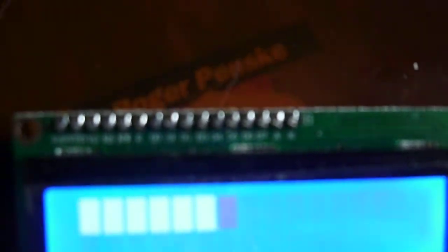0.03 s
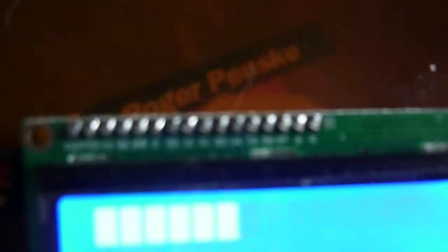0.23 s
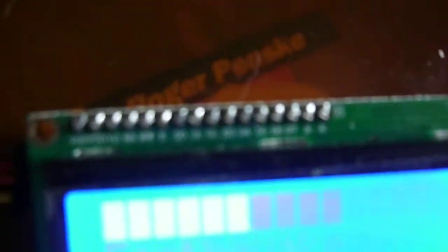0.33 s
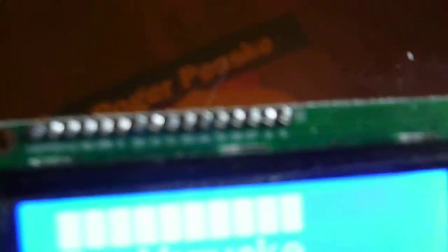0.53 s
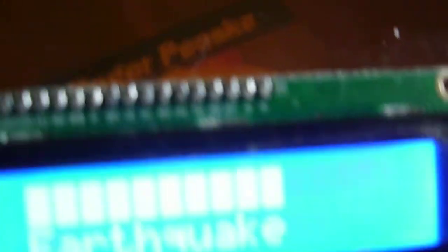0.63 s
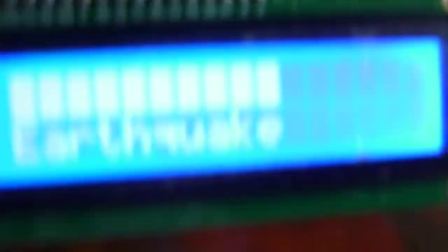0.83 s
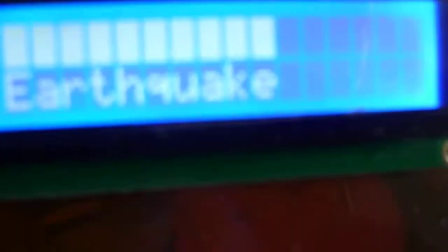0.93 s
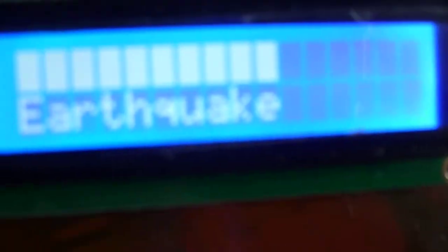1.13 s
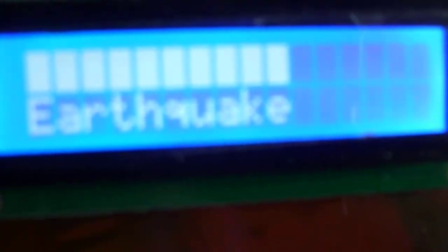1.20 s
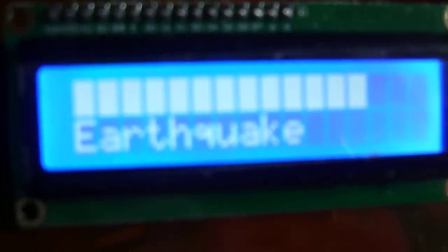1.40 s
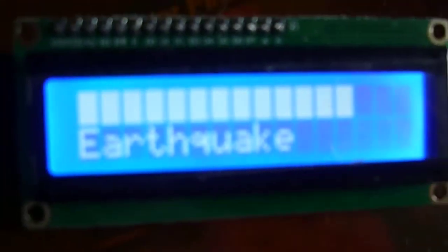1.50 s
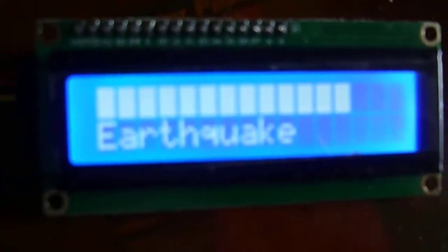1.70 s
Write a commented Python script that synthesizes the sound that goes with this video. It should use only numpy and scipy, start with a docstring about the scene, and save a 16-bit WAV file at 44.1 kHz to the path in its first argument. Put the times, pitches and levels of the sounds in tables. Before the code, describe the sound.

Low, dull room rumble with faint wavering hum and hiss. At about 0.2 s a hand slams a wooden table close to a small, muffled microphone: a hard, clipped knock with a low woody boom. Loose things bounce and clatter until about 0.4 s, with a fading buzz and short room tail. The ducked rumble slowly swells back; near 1.15 s comes a faint, distant clack.

```python
"""Low room rumble with two faint drones and hiss; then a hand slams onto a wooden table close to a small
camera microphone; loose things on the top jump and clatter back; later a faint far clack.
Rumble: noise bands. Table, clatter, clack: clicks and noise bursts into decaying modes, clicks also into a room tail.
The blow overloads the input, the gain control ducks and the rumble slowly returns."""
import sys
import numpy as np
from scipy import signal
from scipy.io import wavfile

SR = 44100
rng = np.random.default_rng(int(sys.argv[2]) if len(sys.argv) > 2 else 0)


def undo_db(level):
    """Turn decibels back into plain size, where 20 dB means ten times bigger."""
    steps = np.asarray(level, float) / 20
    return 10 ** steps


def generate_wav(signal):
    """Clip the signal to [-1, 1] and save it as 16-bit WAV at the path in sys.argv[1]."""
    frames = np.transpose(np.atleast_2d(signal))
    scaled = np.clip(frames, -1, 1) * 32767
    pcm = np.round(scaled).astype(np.int16)
    wavfile.write(sys.argv[1], SR, pcm)


N = 77175

# room rumble spectrum, relative: f/Hz, density/dB per Hz
RUMBLE_SPECTRUM = [(18, -77.5), (30, -7.5), (104, -5), (158, -9.5), (199, -0.5), (290, -9), (349, -6),
                   (462, -7), (910, -15.5), (1200, -18), (1880, -26.5), (8000, -45), (10400, -70),
                   (17600, -120)]
# appliance drones: f/Hz, rms level/dB, noise width/Hz
DRONES = [(113.3, -54, 9.3), (211.8, -54, 4)]
# hard contacts: t/s, click level/dB, chatter decay time/s, unrung snap relative to chatter/dB
HARD_CONTACTS = [(0.2093, -11, 0.00056, -24), (0.2177, -18, 0.001, -4), (0.241, -44, 0.0016, 0),
                 (0.2676, -20, 0.004, 2), (0.2789, -11, 0.0021, 10), (0.292, -30, 0.0052, 0.5),
                 (0.3, -30.5, .004, 0), (0.3192, -33.5, 0.0062, -9.5)]
# ring of a hard contact: f/Hz, level/dB, t60/s
CONTACT_MODES = [(1640, 0.5, .005), (2250, -1.5, 0.0074), (2620, -17, 0.0056), (3510, -10, 0.011),
                 (4440, -3.5, 0.0034), (5640, -13.5, 0.0039), (6800, -27, 0.0037), (7660, -16.5, 0.0021)]
# diffuse room tail by octave: f/Hz, level/dB, t60/s
ROOM_TAIL = [(70, -9.5, 0.45), (170, -22, 0.7), (278, -12, 0.39), (600, -15.5, 0.32), (1200, -24.5, 0.41),
             (2500, -27, 0.4), (4440, -31, 0.34), (7240, -30.5, 0.27)]
# pushes into the top, hand first, then things landing:
# t/s, level/dB, contact low-pass f/Hz, signed strength (+ down, - rebound)
TABLE_PUSHES = [(0.2096, -5.5, 2050, 0.98), (0.216, -11, 1500, 0.96), (0.2614, -18.5, 700, -1.06),
                (.2690, -11, 1200, -1.17), (0.27, -12, 920, 0.87), (0.2737, -10, 895, -0.935),
                (0.295, -19.5, 800, -1.1), (.3210, -25, 600, 0.85), (.3900, -23.5, 600, 0.63)]
# table top modes: f/Hz, level/dB, t60/s
TABLE_MODES = [(67.8, -53, 0.8), (124.2, -2.5, 0.518), (169.7, -4, 0.042), (208.6, -4, 0.28),
               (271, -21, 0.18), (328.8, -17, 0.47), (415, -6, 0.027), (490, -33, 0.012), (600, -8, 0.023),
               (800, -2.5, 0.013), (1036, -3.5, 0.017), (1190, -16.5, 0.069), (1600, -5, 0.028)]
# taps of the far object: t/s, level/dB
FAR_TAPS = [(1.1527, -46), (1.157, -47.5), (1.1641, -48), (1.1720, -49.5), (1.1778, -53), (1.1860, -55)]
# far object modes, relative: f/Hz, level/dB, t60/s
FAR_MODES = [(700, -1, 0.028), (1200, -9, 0.04), (1500, -4, 0.052), (1660, -4, 0.041), (2000, -4, 0.032),
             (2350, -6, 0.022), (3020, -14, 0.014), (4060, -10.5, 0.011), (4660, -10, 0.0063)]

RUMBLE_RMS_DB, RUMBLE_FLICKER_DB, RUMBLE_FLICKER_HZ = -46.5, 0.91, 1.0
HISS_DB, HISS_LOW_HZ = -60.5, 1500
RATTLE_START_S, RATTLE_PER_S, RATTLE_BASE_DB, RATTLE_T60_S = 0.222, 5400, -48.5, 0.73
CHATTER_REL_DB = -14.5       # chatter against its click
RATTLE_SNAP_REL_DB = -6      # unrung bright part of the rattle
ROOM_BUILD_S = 0.01
SWING_HZ = 145               # modes below first move away from the microphone
CLACK_SMEAR_S, CLACK_GAIN_DB = 0.0026, -13.5
MIC_LOW_HZ = 66
OVERLOAD_PEAK = 0.55
DUCK_FROM_DB, DUCK_SHARE, DUCK_SMOOTH_S = -19, 0.61, 0.0045
HELD_FALL_DB_PER_S = 18      # gain recovers at DUCK_SHARE times this
TOP_STOP_HZ = 8670 * 1.0975  # 60 dB down from here
OFFSET = 0.0142              # constant, full scale = 1


def rms_one(x):
    """Scale to rms 1."""
    return x / np.sqrt(np.mean(x ** 2) + 1e-20)


def one_pole(x, tau_s):
    """Smoothing low-pass with time constant tau_s."""
    r = np.exp(-1 / (max(tau_s, 1e-5) * SR))
    return signal.lfilter([1 - r], [1, -r], x)


def drift(rate_hz):
    """Slow random wander of rms 1: noise through two one-pole low-passes."""
    tau_s = 1 / (2 * np.pi * rate_hz)
    slow = one_pole(one_pole(rng.standard_normal(N + SR), tau_s), tau_s)
    return rms_one(slow[SR:])  # skip the filter start-up


def ring(force, hz, t60_s):
    """Two-pole mode: a unit click sets a decaying sine of height 1 ringing."""
    r = undo_db(-60 / (t60_s * SR))
    w = 2 * np.pi * hz / SR
    return signal.lfilter([0, np.sin(w)], [1, -2 * r * np.cos(w), r * r], force + 1e-18)


def decay_from(start_s, tau_s):
    """Envelope: zero up to start_s, then exponential decay."""
    t = np.arange(N) / SR
    return (t > start_s) * np.exp(-np.maximum(t - start_s, 0) / tau_s)


def drones():
    """Appliance drones: noise through narrow resonances, so they waver."""
    out = 0
    for hz, db, width_hz in DRONES:
        tone = ring(rng.standard_normal(N + SR), hz, 3.2 / width_hz)
        out = out + undo_db(db) * rms_one(tone[SR:])
    return out


def rumble():
    """Third-octave noise bands that flicker gently together, plus drones."""
    edges_hz = 25 * 2 ** np.arange(0, 8.6, 1 / 3)
    white = rng.standard_normal((2, N + 8000))  # adjacent bands use different noise
    hz, db = np.transpose(RUMBLE_SPECTRUM)
    flicker_db = RUMBLE_FLICKER_DB * drift(RUMBLE_FLICKER_HZ)
    out = 0
    for k, (low, high) in enumerate(zip(edges_hz, edges_hz[1:])):
        sos = signal.butter(2, [low, high], "band", fs=SR, output="sos")
        band = signal.sosfilt(sos, white[k % 2])[8000:]
        level_db = np.interp(np.log(low * high) / 2, np.log(hz), db)
        out = out + band * undo_db(level_db + flicker_db)
    return undo_db(RUMBLE_RMS_DB) * rms_one(out) + drones()


def hiss():
    """Electronics noise: high-passed white noise."""
    sos = signal.butter(1, HISS_LOW_HZ, "high", fs=SR, output="sos")
    return undo_db(HISS_DB) * signal.sosfilt(sos, rng.standard_normal(N))


def rattle_envelope():
    """Small parts buzzing on the shaking top: random hits of random strength, dying away."""
    late_s = np.maximum(np.arange(N) / SR - RATTLE_START_S, 0)
    hits = (rng.random(N) < RATTLE_PER_S / SR) * (late_s > 0)
    extra_db = 1.8 * np.minimum(rng.exponential(1, N), 4)
    return hits * undo_db(RATTLE_BASE_DB + extra_db - 60 * late_s / RATTLE_T60_S)


def clatter():
    """Hard contacts: click plus short noise chatter, and the rattle, into modes; also returns the clicks."""
    clicks = np.zeros(N)
    noise_env = rattle_envelope()
    snap_env = undo_db(RATTLE_SNAP_REL_DB) * noise_env
    for s, db, tau_s, snap_db in HARD_CONTACTS:
        clicks[int(s * SR)] = undo_db(db)
        chatter = undo_db(db + CHATTER_REL_DB) * decay_from(s, tau_s)
        noise_env = noise_env + chatter
        snap_env = snap_env + undo_db(snap_db) * chatter
    out = snap_env * rng.standard_normal(N)  # bypasses the modes
    for hz, db, t60_s in CONTACT_MODES:
        force = clicks + noise_env * rng.standard_normal(N)
        out = out + undo_db(db) * ring(force, hz, t60_s)
    return out, clicks


def room(x):
    """Dense reflections: convolution with noise that builds up and dies band by band."""
    t = np.arange(SR) / SR
    tail = 0
    for hz, db, t60_s in ROOM_TAIL:
        sos = signal.butter(2, [hz / np.sqrt(2), hz * np.sqrt(2)], "band", fs=SR, output="sos")
        band = rms_one(signal.sosfilt(sos, rng.standard_normal(SR)))
        tail = tail + band * undo_db(db - 60 * t / t60_s)
    build = 1 - np.exp(-t / ROOM_BUILD_S)
    return signal.fftconvolve(x, tail * build)[:N]


def table_top():
    """Soft pushes, each a low-passed click, into the modes of the top."""
    force = np.zeros(N)
    for s, db, cut_hz, strength in TABLE_PUSHES:
        click = np.zeros(N)
        click[int(s * SR)] = strength * undo_db(db)
        force += one_pole(click, 1 / (2 * np.pi * cut_hz))
    out = np.zeros(N)
    for hz, db, t60_s in TABLE_MODES:
        sign = -1 if hz < SWING_HZ else 1
        out += sign * undo_db(db) * ring(force, hz, t60_s)
    return out


def clack():
    """A far object settles in a few taps: noise bursts, smeared by reflections, into its modes."""
    env = sum(undo_db(db) * decay_from(s, CLACK_SMEAR_S) for s, db in FAR_TAPS)
    out = np.zeros(N)
    for hz, db, t60_s in FAR_MODES:
        out += undo_db(db + CLACK_GAIN_DB) * ring(env * rng.standard_normal(N), hz, t60_s)
    return out


def scene():
    """Table, clatter, clack and the room tail of the clicks, high-passed, over the rumble."""
    hard, clicks = clatter()
    hits = hard + room(clicks) + table_top() + clack()
    mic = signal.butter(2, MIC_LOW_HZ, "high", fs=SR, output="sos")
    return (signal.sosfilt(mic, hits) + rumble())[None]


def gain_control(x):
    """Duck by a share of the held peak level above threshold; the hold falls steadily in dB."""
    climb_db = HELD_FALL_DB_PER_S * np.arange(N) / SR
    level_db = 20 * np.log10(np.abs(x) + 1e-9)
    held_db = np.maximum.accumulate(level_db + climb_db) - climb_db
    over_db = one_pole(np.maximum(held_db - DUCK_FROM_DB, 0), DUCK_SMOOTH_S)
    return x * undo_db(-DUCK_SHARE * over_db)


def low_pass(x):
    """Removes everything above the highest recorded frequency."""
    return signal.sosfilt(signal.butter(12, 8970, fs=SR, output="sos"), x)


def record(dry):
    """Input overload, gain control, hiss, steep top cut, offset."""
    clipped = np.clip(dry[0], -OVERLOAD_PEAK, OVERLOAD_PEAK)
    noisy = gain_control(clipped) + hiss()
    top_cut = signal.cheby2(10, 60, TOP_STOP_HZ, fs=SR, output="sos")
    mix = signal.sosfilt(top_cut, noisy)[None] + OFFSET
    return low_pass(mix)


dry = scene()
out = record(dry)
generate_wav(out)
```